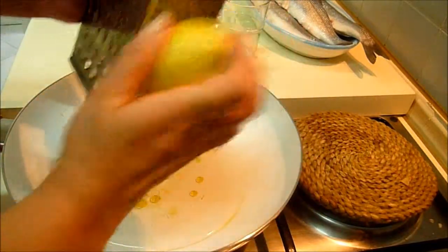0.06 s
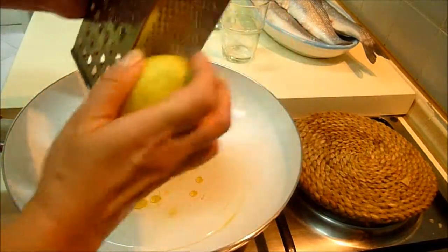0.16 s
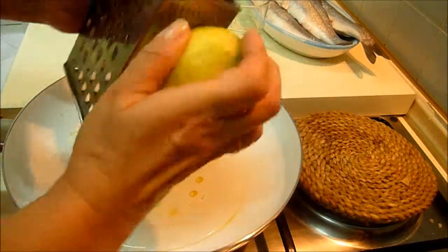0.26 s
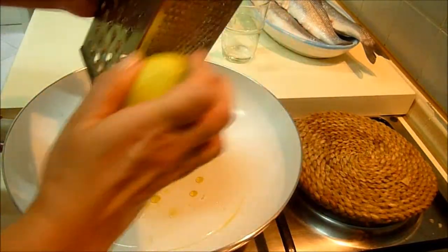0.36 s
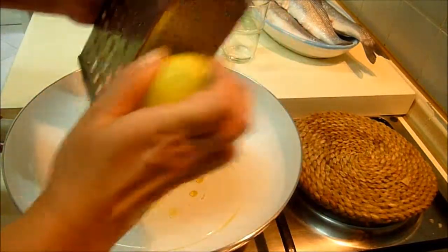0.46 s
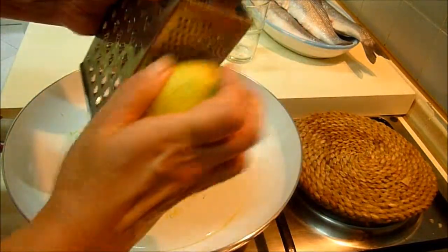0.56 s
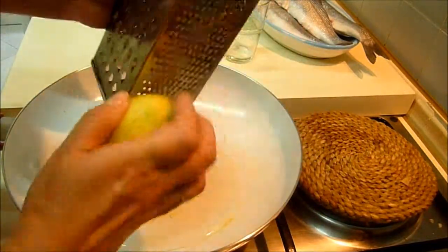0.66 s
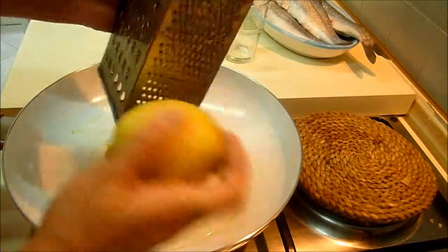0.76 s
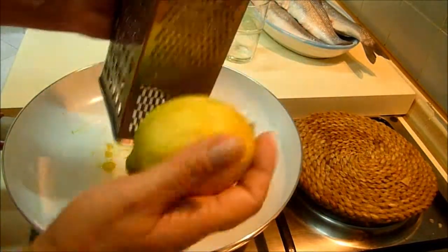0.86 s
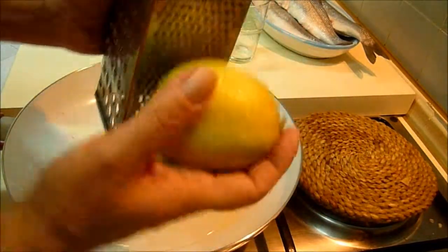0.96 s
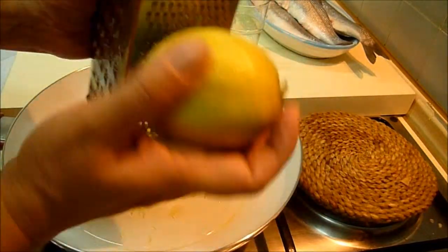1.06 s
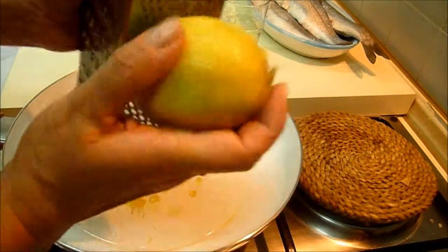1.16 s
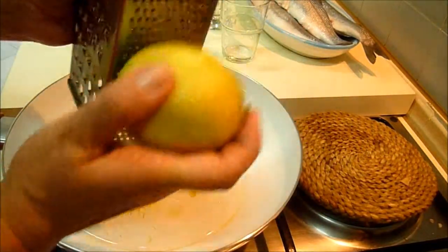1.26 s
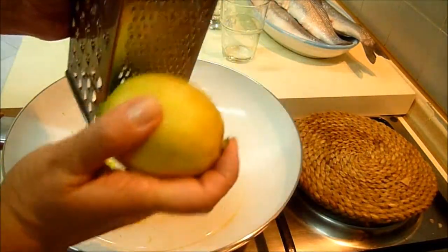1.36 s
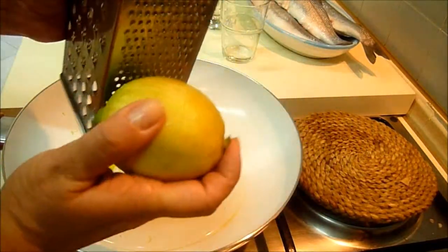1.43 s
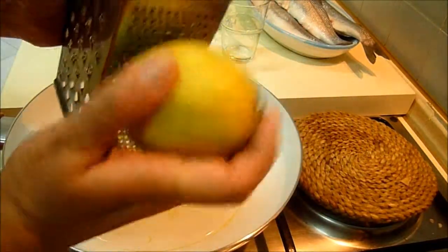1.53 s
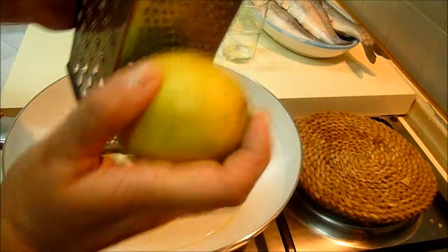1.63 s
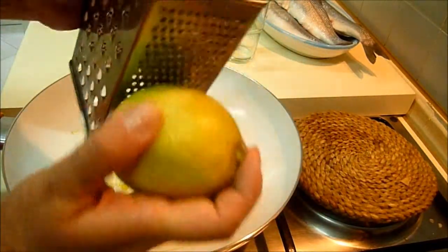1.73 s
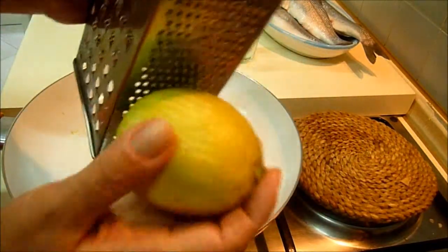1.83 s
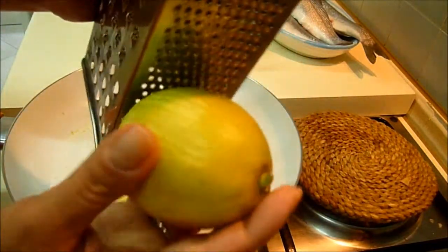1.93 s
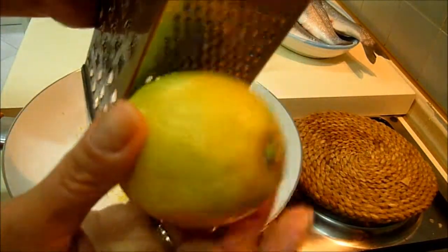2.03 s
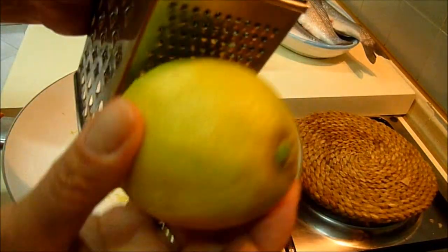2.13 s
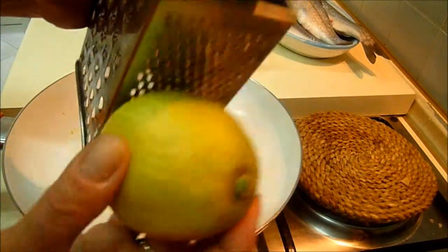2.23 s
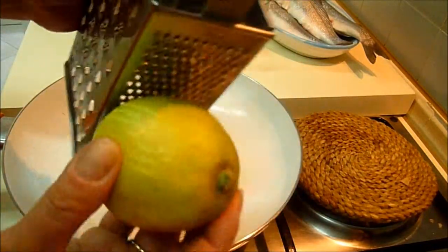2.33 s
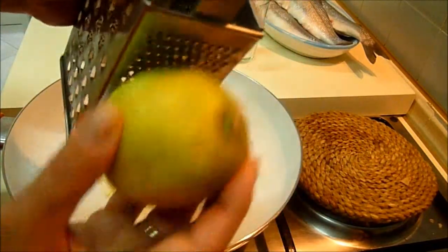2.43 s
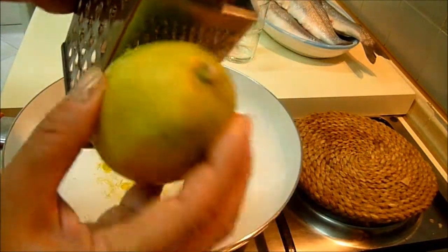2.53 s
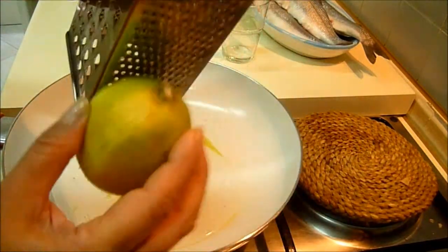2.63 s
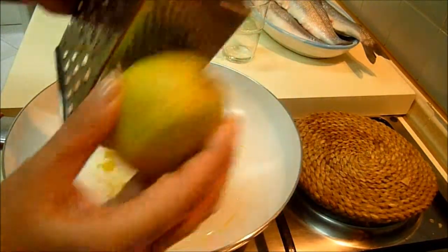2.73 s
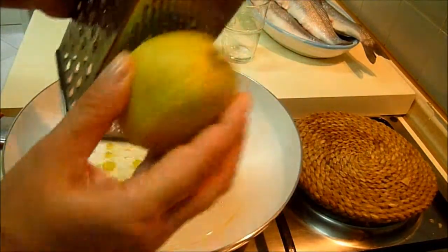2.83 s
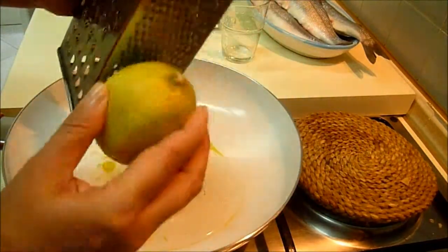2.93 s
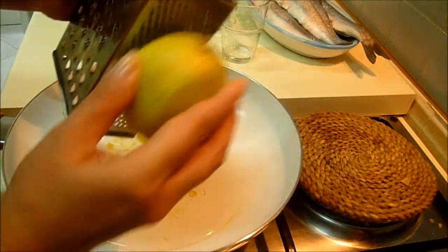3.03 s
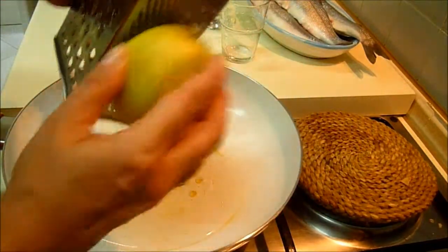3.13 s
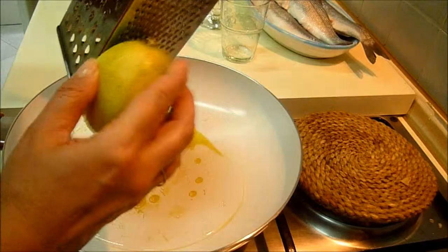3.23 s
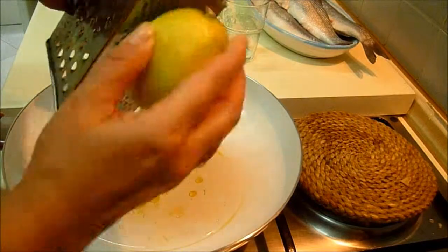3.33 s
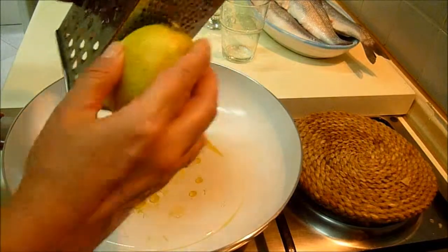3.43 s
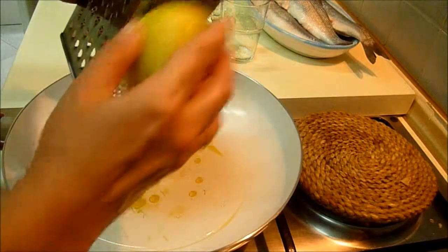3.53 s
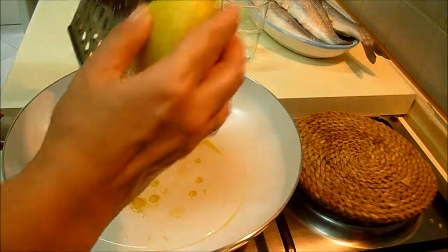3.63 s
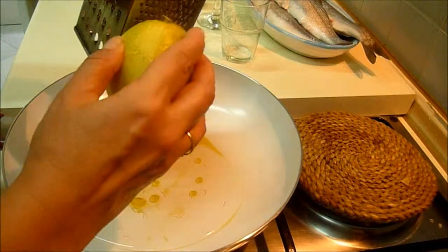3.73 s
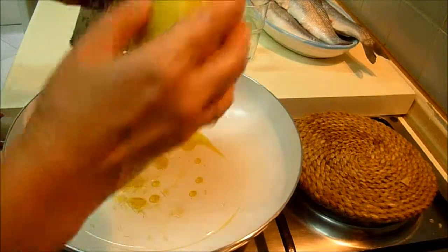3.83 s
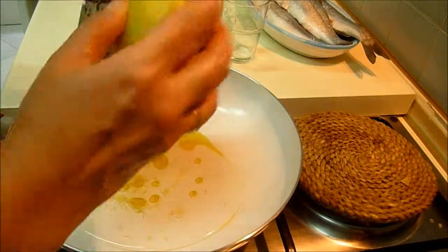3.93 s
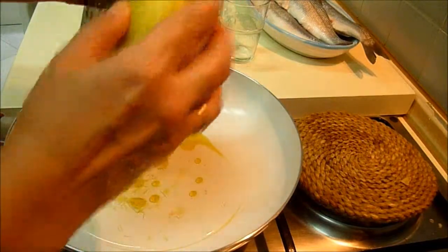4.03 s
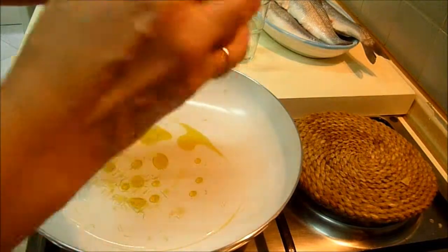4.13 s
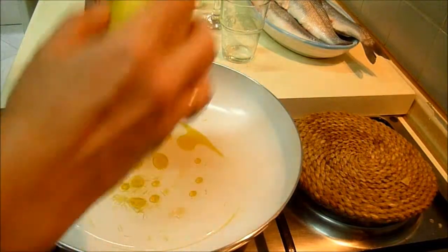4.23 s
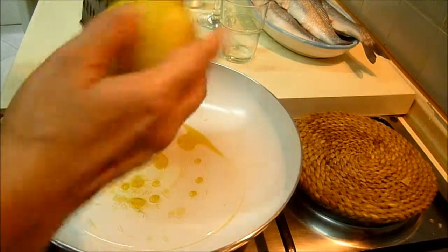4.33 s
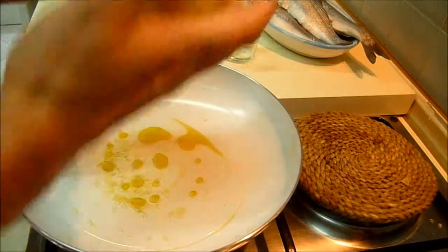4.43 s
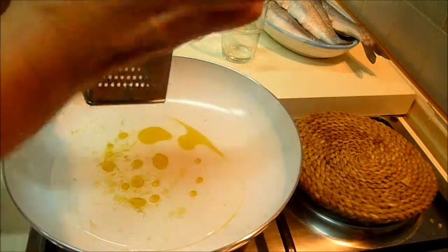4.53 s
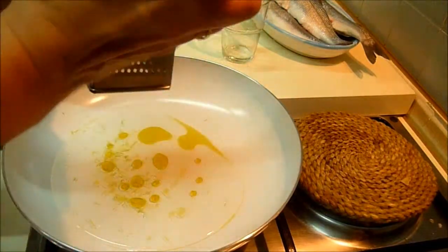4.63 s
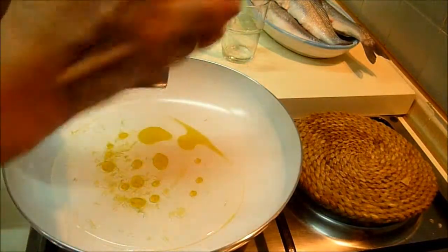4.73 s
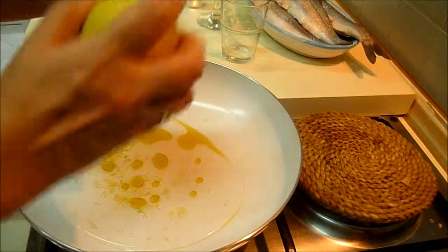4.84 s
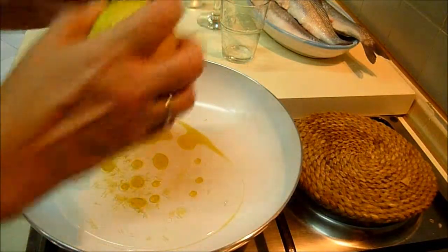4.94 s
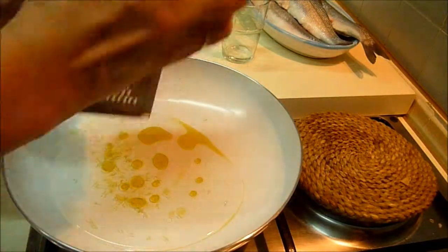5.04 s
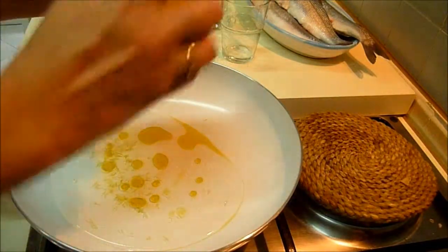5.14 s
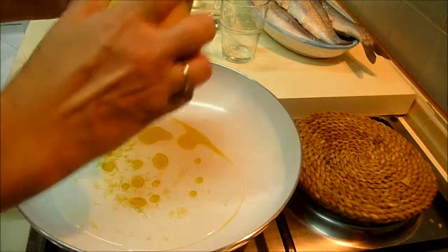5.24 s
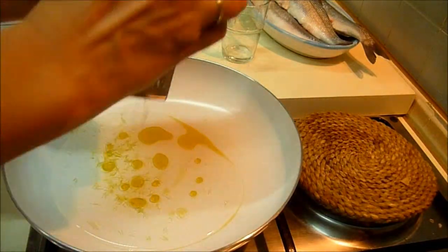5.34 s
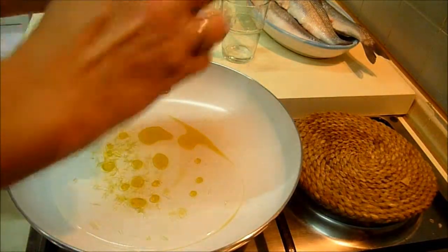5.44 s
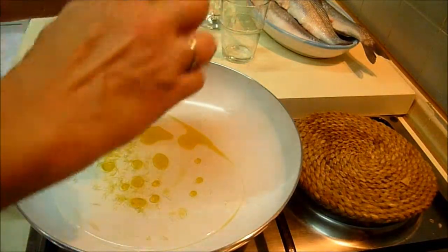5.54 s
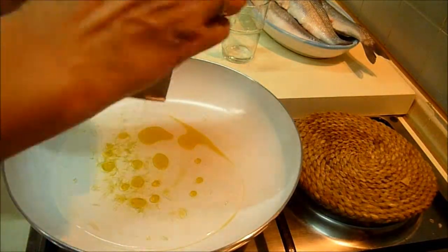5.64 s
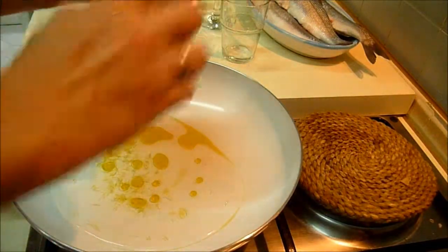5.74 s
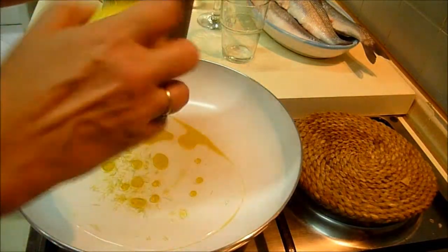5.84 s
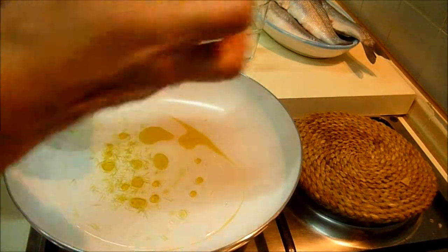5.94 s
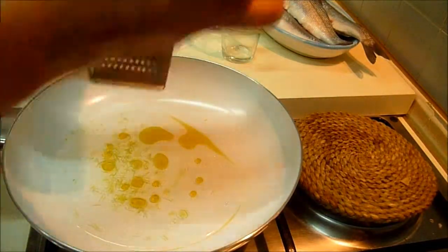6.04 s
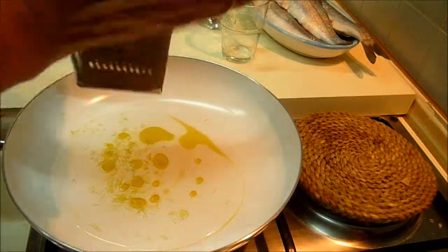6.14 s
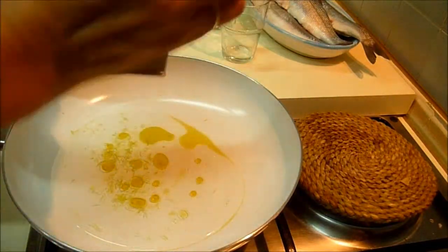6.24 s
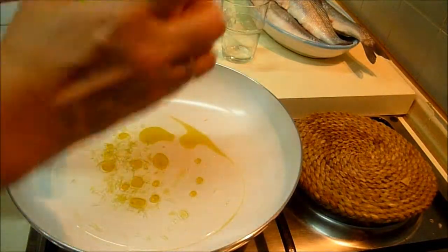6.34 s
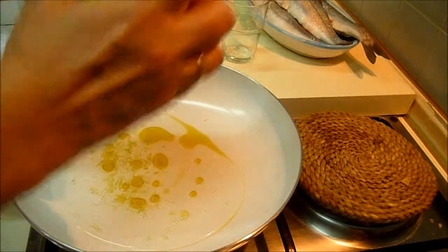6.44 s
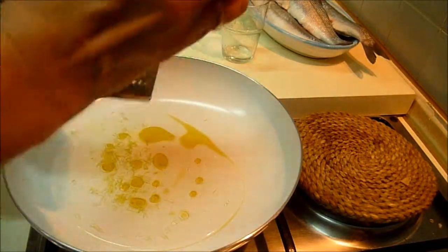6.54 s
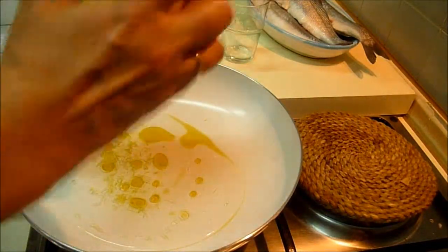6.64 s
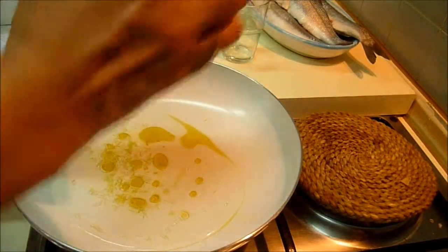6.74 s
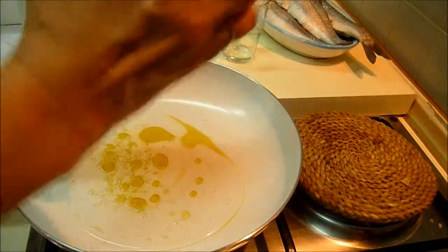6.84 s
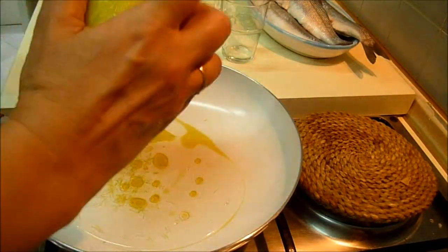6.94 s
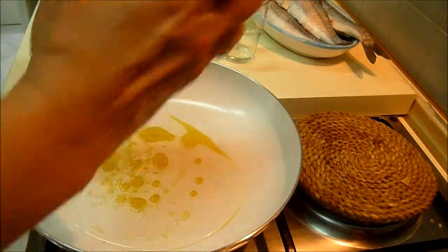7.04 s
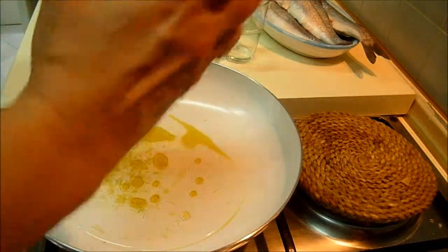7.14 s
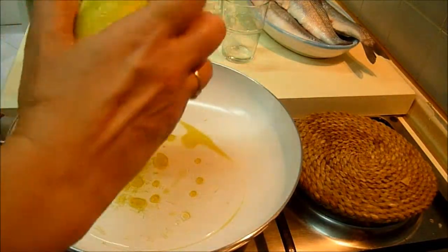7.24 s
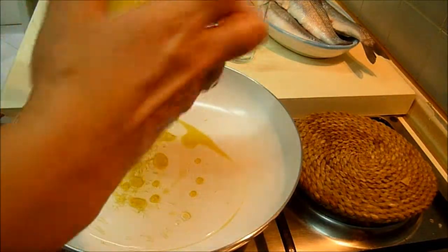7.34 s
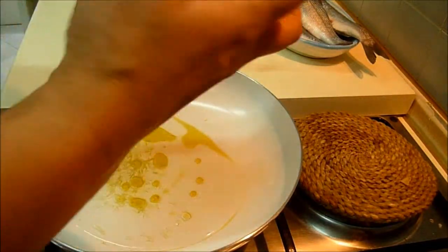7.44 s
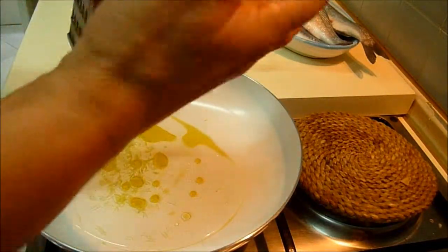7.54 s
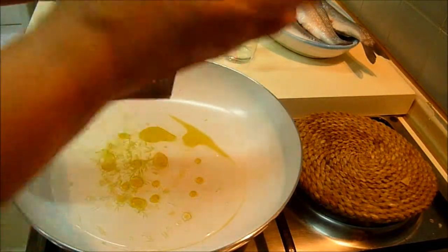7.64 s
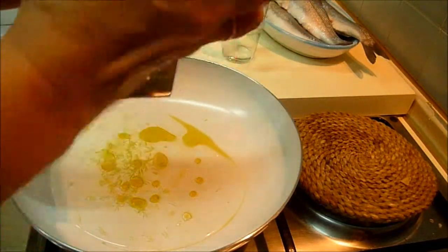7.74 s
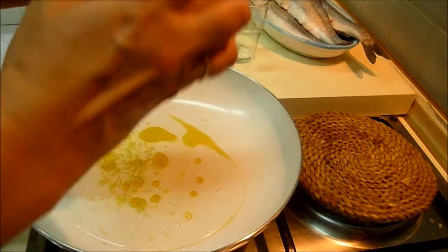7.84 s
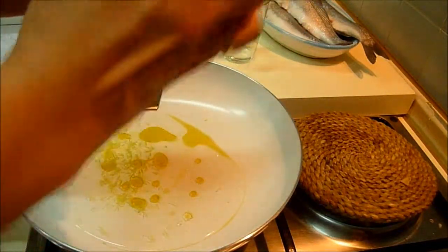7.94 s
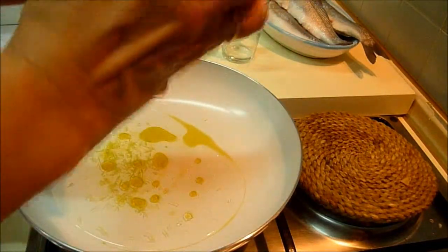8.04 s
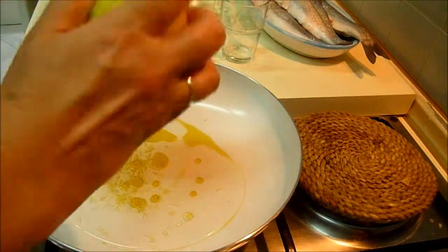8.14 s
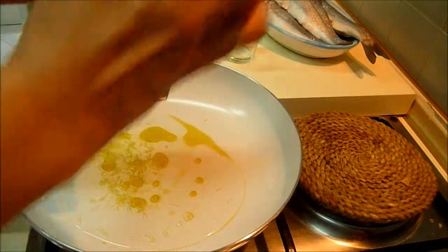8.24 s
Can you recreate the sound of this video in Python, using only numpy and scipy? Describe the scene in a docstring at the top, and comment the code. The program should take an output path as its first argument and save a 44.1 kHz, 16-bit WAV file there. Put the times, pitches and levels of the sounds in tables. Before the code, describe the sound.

Close up in a small kitchen, lemon rind scrapes over the teeth of a metal grater. A few quick strokes give way to lighter, scattered ones, then firmer grating runs at three or four strokes a second. Each is a brief, crackly rasp, often followed by a softer, duller slide back. Occasional bumps ring the steel briefly, and a faint fan-like whir continues underneath.

```python
"""Zesting a lemon

A lemon is rubbed on a steel box grater, close by in a small kitchen. Each stroke drags the rind over
rows of teeth, some forty a second, and every row tears it in a swarm of tiny snaps. The hand speeds up
and presses hardest around mid-stroke; now and then a tooth snags. The fruit slides back softly between
strokes, the grater sometimes knocks, and a faint steady whir fills the room."""
import sys
import numpy as np
from scipy import signal
from scipy.fft import rfft, irfft, next_fast_len
from scipy.io import wavfile
from scipy.ndimage import map_coordinates

SR = 44100
rng = np.random.default_rng(int(sys.argv[2]) if len(sys.argv) > 2 else 0)


def inscribe(sig):
    """Save sig as 16-bit PCM at rate SR to the path in sys.argv[1].

    A 1-D sig is mono; a 2-D sig holds one channel per row.
    Samples are clipped to [-1, 1] before scaling.
    """
    pcm = np.round(np.clip(np.atleast_2d(sig).T, -1, 1) * 32767)
    wavfile.write(sys.argv[1], SR, pcm.astype(np.int16))


N = 365588
TOP_HZ = 8600  # the sound is cut off above this

# Pitches at which the steel box rings when rubbed. Each row: pitch in Hz, width in Hz, strength in dB.
BOX_RESONANCES = [(468, 100, 3.5), (1088, 50, 5), (1323, 180, 5), (2390, 180, 3.5), (2880, 830, 0),
                  (4690, 410, -2.5), (5820, 610, 0), (7130, 340, 8)]


def amp(db):
    """Turn decibels into a number to multiply a sound by."""
    return 10 ** (np.asarray(db) / 20)


def unit(x):
    """Scale a sound to an average power of 1."""
    return x / np.sqrt(np.mean(x ** 2) + 1e-20)


def along(points, hz):
    """Read a curve drawn through (Hz, value) points, with octaves evenly spaced."""
    point_hz, values = np.transpose(points)
    return np.interp(np.log(hz + 1), np.log(point_hz + 1), values)


def peaks(bands, hz):
    """A gain that lifts the sound around each resonance and leaves the rest alone."""
    lifts = (amp(db) ** 2 / (1 + (2 * (hz - centre) / width) ** 2) for centre, width, db in bands)
    return np.sqrt(1 + sum(lifts))


def filtered(x, gain):
    """Make each frequency of x louder or softer by gain(hz)."""
    size = 2 * next_fast_len(len(x) // 2 + 4096)
    hz = np.fft.rfftfreq(size, 1 / SR)
    cepstrum = irfft(np.log(np.maximum(gain(hz), 1e-6)))
    # folding onto the first half makes the filter ring after a sound, never before it
    cepstrum[1:size // 2] *= 2
    cepstrum[size // 2 + 1:] = 0
    return irfft(rfft(x, size) * np.exp(rfft(cepstrum)), size)[:len(x)]


def coloured(x, gain):
    """Shape the tone of a hiss so that its rasping range holds about the power of the whole input."""
    rasp_hz = np.linspace(1500, 8000, 400)
    power = np.mean(gain(rasp_hz) ** 2) * np.ptp(rasp_hz) / (SR / 2)
    return filtered(x, lambda hz: np.where(hz < TOP_HZ, gain(hz), amp(-67))) / np.sqrt(power)


def wobble(rate, count):
    """A smooth curve through random values, rate of them a second."""
    values = rng.standard_normal(int(count * rate / SR) + 4)
    return map_coordinates(values, [np.arange(count) * rate / SR])


def tail(x, t60, delay):
    """A wash of echoes of x that starts after delay seconds and fades 60 dB in t60 seconds."""
    t = np.arange(SR // 2) / SR
    echoes = rng.standard_normal(len(t)) * amp(-60 * t / t60) * (t >= delay)
    return signal.fftconvolve(x, echoes / np.linalg.norm(echoes))[:len(x)]


def kitchen(x):
    """What the worktop and walls send back of a nearby sound."""
    return amp(-12.5) * tail(x, t60=0.29, delay=0.006)


def whir():
    """A steady background, like a distant fan, with a few thin whistles."""
    # The tone of the whir. Each row: frequency in Hz, relative level in dB.
    tone = [(20, -16.5), (60, -3.5), (110, 2.5), (190, -2), (380, -1.5), (620, -5.5), (880, -1.5),
            (1020, -6.5), (1400, -8.5), (2100, -15), (3600, -17.5), (5600, -18), (7400, -23.5)]
    # Narrow bands that stand out of it. Each row: pitch in Hz, width in Hz, strength in dB.
    whistles = [(113, 14, -4.5), (1186, 85, 9.5), (1460, 40, 6), (1800, 70, 9), (3360, 230, 2.5),
                (4850, 250, -4), (6180, 43, 18), (6980, 170, 10), (7070, 87, 16)]
    air = filtered(rng.standard_normal(N), lambda hz: amp(along(tone, hz)) * peaks(whistles, hz))
    return amp(-46.5 + 1.3 * wobble(rate=4.4, count=N)) * unit(air)


def knocking():
    """Fruit and grater bump: the soft blow rings the box over a dull thud and a short tick."""
    # The bumps. Each row: start in seconds, relative level in dB, the thud's level within it in dB.
    knocks = [(.989, -39, -16), (1.221, -32, -11), (1.682, -33, 2), (4.526, -29, -5), (4.645, -34, -14),
              (6.1698, -16.5, -2.5), (7.669, -26.5, -0.5)]
    # The notes of the box. Each row: pitch in Hz, relative level in dB, seconds to fade by 60 dB.
    box_notes = [(448, -11, 0.051), (669, -1.5, 0.052), (747, -4, 0.027), (1102, -2.5, 0.051),
                 (1430, -2.5, 0.02), (1844, -10, 0.067), (2130, -10, 0.0073), (2300, -3, 0.036),
                 (2590, -2.5, 0.023), (3640, -7, 0.012)]
    # The tone of the thud. Each row: frequency in Hz, relative level in dB.
    thud_tone = [(30, -27), (70, -5), (115, 7), (190, -4.5), (320, -8), (800, -33), (3000, -69)]
    out = np.zeros(N + SR)
    t = np.arange(SR // 2) / SR
    for start, db, thud_db in knocks:
        ring = np.zeros(len(t))
        for pitch, note_db, t60 in box_notes:
            fade = amp(note_db + 2 * rng.standard_normal() - 60 * t / t60)
            ring += fade * np.sin(2 * np.pi * (pitch * t + rng.random()))
        rumble = filtered(rng.standard_normal(SR), lambda hz: amp(along(thud_tone, hz)))[-len(t):]
        thud = amp(thud_db - 60 * t / 0.057) * unit(rumble)
        tick = amp(-2.5 - 60 * t / 0.041) * rng.standard_normal(len(t))
        fade_in = 1 - np.exp(-t / 0.00051)
        knock = amp(db - 4.5) * (ring + thud + tick) * fade_in
        out[round(start * SR):][:len(t)] += knock + kitchen(knock)
    return out[:N]


def snaps(rate, spread_db, count):
    """Tiny breaks in the rind, about rate of them a second, random in timing and size."""
    happens = rng.random(count) < rate / SR
    direction = np.sign(rng.standard_normal(count))
    size = amp(spread_db * np.clip(rng.standard_normal(count), -2, 2))
    return unit(happens * direction * size)


def steel_sheet(force):
    """Add the many high notes of the thin steel, which the hand quickly damps."""
    treble = signal.sosfilt(signal.butter(1, 1200, "highpass", fs=SR, output="sos"), force)
    return force + amp(-8.5) * tail(treble, t60=0.018, delay=0.001)


def sliding():
    """On the way back the blunt side of the teeth only scuffs the rind: soft, dull and a little uneven."""
    # The slides between strokes. Each row: middle of the slide in seconds, relative level in dB.
    slides = [(.222, -36), (.478, -34), (1.504, -43), (2.07, -43), (2.735, -33.5), (3.029, -39),
              (3.292, -32.5), (3.55, -35), (3.813, -28), (4.084, -30), (4.985, -32.5), (5.294, -36.5),
              (5.6, -33), (6.475, -31), (6.76, -34), (7.028, -33.5), (7.953, -41.5), (8.225, -31.5)]
    # The tone of sliding rind. Each row: frequency in Hz, relative level in dB.
    tone = [(60, -24.5), (300, -11), (600, 1), (900, -9), (1400, -4), (2000, -7), (2600, -2), (3600, -10),
            (5500, -6.5), (7400, -19)]
    half_slide_s = 0.021
    t = np.arange(N) / SR
    power = sum(amp(db) ** 2 * np.exp(-np.minimum(((t - middle) / half_slide_s) ** 2, 20))
                for middle, db in slides)
    flutter = amp(1.1 * wobble(rate=130, count=N))
    force = np.sqrt(power) * flutter * snaps(rate=7000, spread_db=4, count=N)
    scuff = amp(-4) * coloured(steel_sheet(force),
                               lambda hz: amp(along(tone, hz)) * peaks(BOX_RESONANCES, hz))
    return scuff + kitchen(scuff)


def swell(t, centre, width):
    """A smooth hump in time that reaches 1 at its centre."""
    return 1 / np.cosh(np.clip((t - centre) / width, -20, 20)) ** 2


def biting(t, start, length, gap, db, lean_db, half_bite):
    """The power of one stroke: each row of teeth eases into the round fruit, bites deep, then lets go."""
    # Short single catches: a tooth snags and lets go at once, or the fruit lightly touches the teeth just
    # before a stroke. Each row: time in seconds, relative level in dB.
    snags = [(2.903, -19), (3.435, -15), (4.21, -13.5), (4.712, -21.5), (6.222, -23.5), (6.564, -36),
             (6.892, -18), (7.722, -36.5), (8.026, -36), (8.053, -19)]
    half_snag_s = 0.0024
    rows, gap_shrink = 12, 0.053  # the hand speeds up: each gap is this share shorter than the last
    ease_db, uneven_db = 9, 0.81  # lighter pressure at both ends; chance change from bite to bite
    gaps = gap * (1 - gap_shrink) ** np.arange(rows)[:, None]
    arrival = np.cumsum(gaps, axis=0) - gaps
    place = (2 * arrival + gaps) / length - 1  # -1 at the start of the stroke, 1 where the fruit lifts
    pressure_db = db + lean_db * place - ease_db * place ** 2 + uneven_db * rng.standard_normal(gaps.shape)
    bites = (place < 1) * amp(pressure_db) ** 2 * swell(t, start + arrival, half_bite)
    catches = sum(amp(snag_db) ** 2 * swell(t, when, half_snag_s)
                  for when, snag_db in snags if start - 2 * gap < when < start + length)
    return np.sum(bites, axis=0) + catches


def cutting():
    """Rows of teeth tear the rind; where the fruit presses on the steel sets the tone of each stroke."""
    # The cutting strokes. Each row: start, length and first gap between rows of teeth, all in seconds,
    # relative level in dB, lean towards the end in dB, half the length of a bite in seconds,
    # pitch of the steel's ring in Hz, strength of that ring in dB, bass boost or cut in dB.
    strokes = [ (0.055, 0.097, 0.027, -20.5, -9, .0056, 2310, 6, 4.5),
               (.320, 0.088, .0228, -19, 2, 0.0055, 2620, 1, 3.5),
               (0.578, 0.09, 0.018, -23, -3.5, 0.0091, 2780, 6.5, 0.5),
               (1.255, 0.041, .020, -30.5, 11, 0.0054, 2230, 8.5, 14),
               (1.317, 0.043, .0225, -20, 2, .004, 2270, 6.5, 4.5),
               (1.612, .057, 0.028, -22, 3, 0.0057, 2700, 8, 7),
               (1.685, .025, .025, -29, 2, 0.0057, 2760, 3, 8),
               (2.177, .043, 0.021, -29, 7, 0.006, 2620, 11.5, 3),
               (2.557, 0.08, 0.03, -20, 3, 0.0086, 2860, 4, -8),
               (2.850, 0.11, 0.0282, -20, 2, 0.0051, 2420, 6, 4),
               (3.134, 0.092, 0.026, -19, 0, 0.0047, 2440, 5.5, 5),
               (3.402, .096, 0.033, -17, -0.5, 0.0048, 2460, 10, 1.5),
               (3.643, 0.094, 0.0241, -17, 4.5, 0.0061, 2480, 9, -3.5),
               (3.927, 0.083, 0.031, -17, -1, 0.005, 2490, 7.5, 3.5),
               (4.187, 0.095, .0247, -14.5, -4.5, 0.0067, 2400, 8.5, -6.5),
               (4.695, .190, 0.0252, -21, 2, 0.0048, 3030, -1, 0),
               (5.091, 0.11, 0.026, -17, -0.5, 0.0063, 2460, -13, -7.5),
               (5.396, 0.13, 0.0266, -18.5, -1.5, 0.0049, 2470, 0, -1.5),
               (5.696, 0.1, 0.022, -17.5, -0.5, 0.0073, 2440, 1.5, -3.5),
               (6.223, 0.17, 0.02714, -19.5, 3.5, 0.0045, 2430, -11, 1.5),
               (6.597, 0.08, 0.027, -12.5, 1, 0.0046, 2330, -10, 0),
               (6.856, 0.1, 0.035, -15, -0.3, .005, 2430, 7, -1),
               (7.129, 0.13, 0.028, -18, 1.5, 0.0052, 2380, 3, -5),
               (7.755, 0.06, 0.029, -20, 2, 0.0051, 2420, 3.5, 0),
               (7.831, .025, .025, -24, 0, 0.0055, 2420, 2, 5),
               (8.057, 0.097, 0.0269, -15, -3.5, 0.0049, 2500, -2, 6.5)]
    # The tone of tearing rind. Each row: frequency in Hz, relative level in dB.
    tone = [(30, -22), (120, -9.5), (250, -6.5), (600, -2), (900, -7.5), (1400, -3), (1800, -4.5),
            (2300, 0), (3500, 0), (5200, 1.5), (6500, -1), (7400, -9)]
    middle_db, top_db = 0.86, -2.5  # the grip fills the middle range and dulls the top
    out = np.zeros(N + SR)
    for start, length, gap, db, lean_db, half_bite, ring_hz, ring_db, bass_db in strokes:
        first = max(round((start - 0.08) * SR), 0)
        t = (first + np.arange(3 * SR // 5)) / SR
        bite = biting(t, start, length, gap, db, lean_db, half_bite)
        force = np.sqrt(bite) * snaps(rate=7500, spread_db=4, count=len(t))
        grip = [(280, bass_db), (550, middle_db), (1500, middle_db), (3500, 0), (4500, 0), (6500, top_db)]
        rasp = coloured(steel_sheet(force),
                        lambda hz: amp(along(tone, hz) + along(grip, hz)) * peaks(BOX_RESONANCES, hz))
        # the ring of the pressed side is heard close by but does not carry into the room
        near = filtered(rasp, lambda hz: peaks([(ring_hz, 150, ring_db)], hz))
        near *= np.sqrt(np.sum(rasp ** 2) / np.sum(near ** 2))  # same energy as without the ring
        # the loudest bites come with a brief, deep thump
        thump = amp(21.5) * filtered(bite ** 2, lambda hz: hz / (hz + 15) / (1 + (hz / 36) ** 2))
        out[first:][:len(t)] += amp(-3.5) * (near + kitchen(rasp)) + thump
    return out[:N]


def scene():
    """The grater's sounds and the room's whir, added into one channel."""
    return (cutting() + sliding() + knocking() + whir())[None]


def record(dry):
    """Round off the highest peaks, shift the wave slightly off zero and cut the high treble steeply."""
    ceiling, offset, edge_hz = 0.55, 0.017, 7450
    rounded = dry[0] / (1 + (dry[0] / ceiling) ** 4) ** (1 / 4)
    hz = np.fft.rfftfreq(N, 1 / SR)
    roll_off = amp(-26 * (np.maximum(hz - edge_hz, 0) / 750) ** 2)
    return irfft(rfft(rounded + offset) * roll_off * (hz < TOP_HZ), N)[None]


dry = scene()
out = record(dry)
inscribe(out)
```